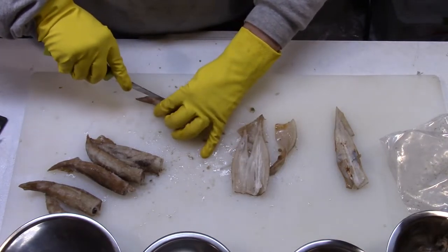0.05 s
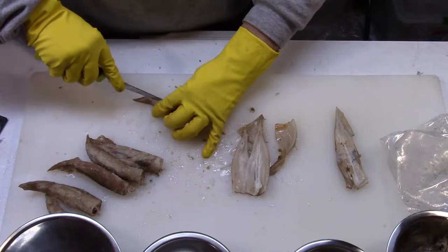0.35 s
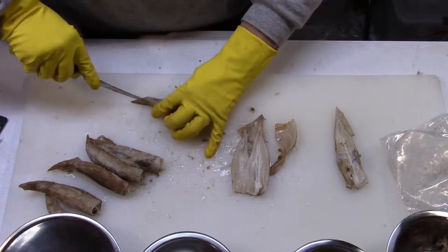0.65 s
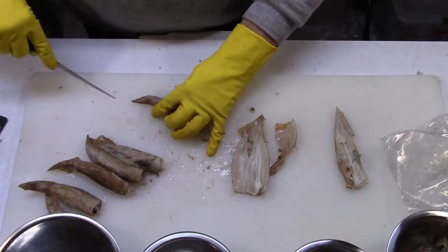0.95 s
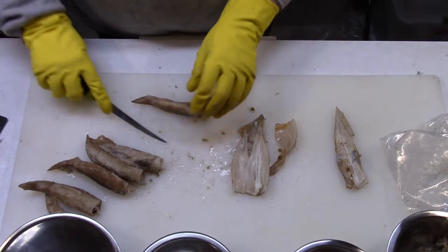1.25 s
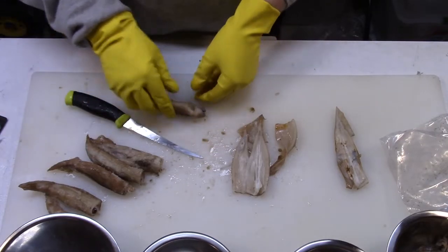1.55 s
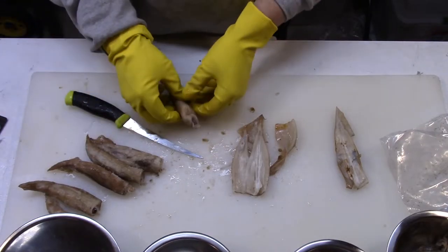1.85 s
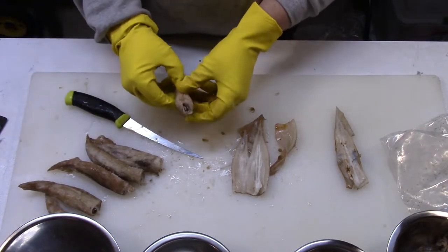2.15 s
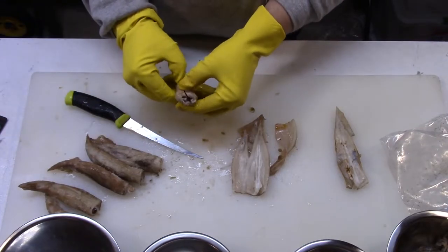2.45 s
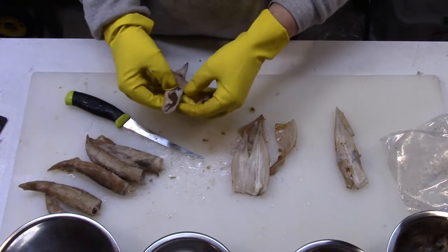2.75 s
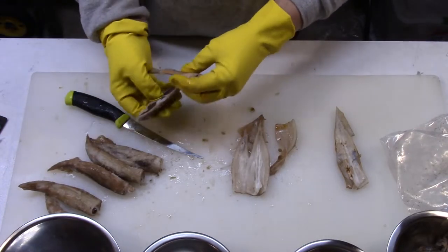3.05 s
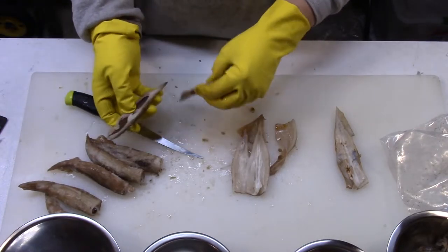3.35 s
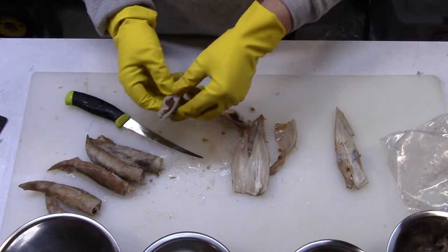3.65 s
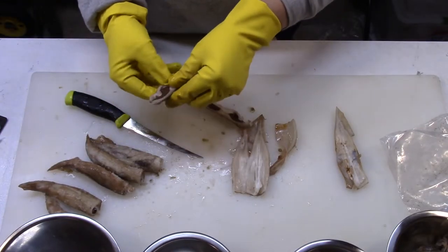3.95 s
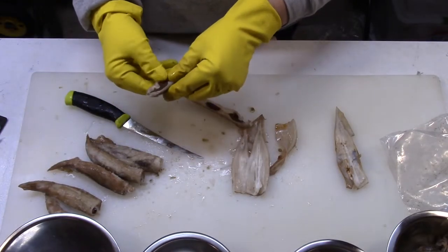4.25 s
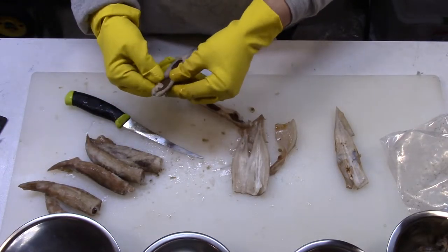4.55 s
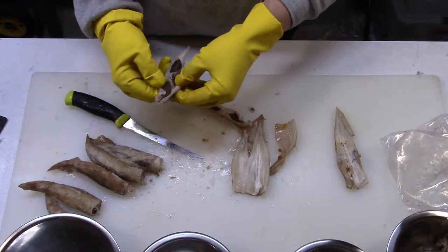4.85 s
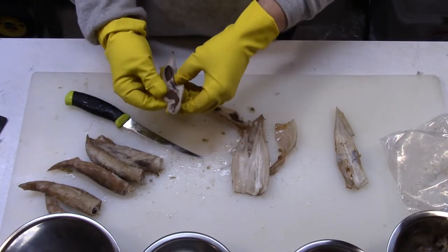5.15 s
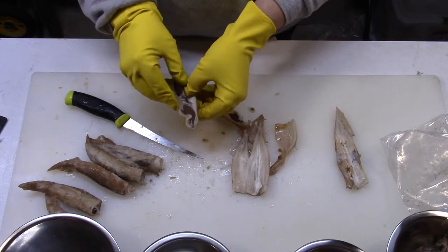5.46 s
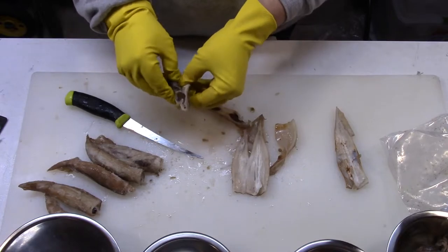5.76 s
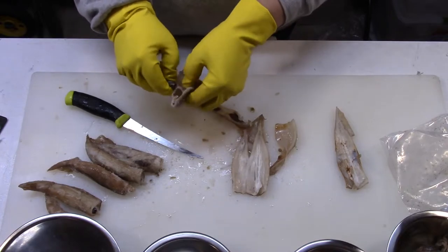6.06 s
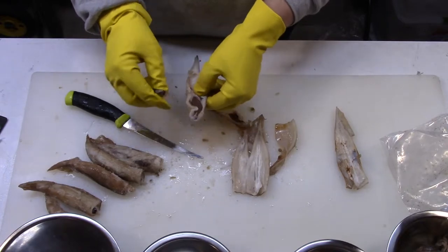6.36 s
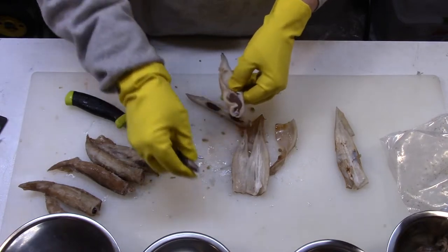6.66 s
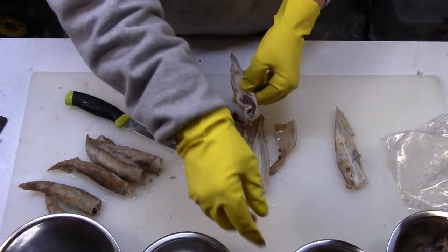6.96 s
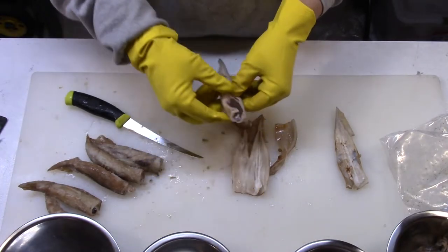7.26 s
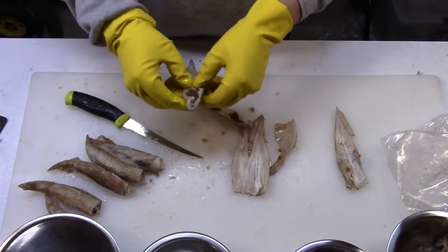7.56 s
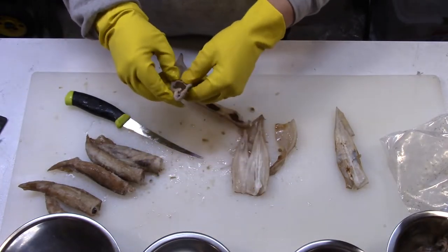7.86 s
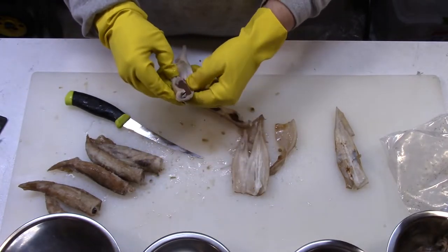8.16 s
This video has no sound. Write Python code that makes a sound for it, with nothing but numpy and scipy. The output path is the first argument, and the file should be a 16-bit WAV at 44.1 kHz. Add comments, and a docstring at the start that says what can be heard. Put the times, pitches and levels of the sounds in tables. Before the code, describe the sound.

For the first 0.8 seconds a knife grates softly through half-frozen squid on a plastic cutting board. Rubber gloves squeak and rub around 1 second. At about 1.4 seconds the knife is dropped on the board with a short, hollow, ringing clatter, by far the loudest sound. Gloves and sleeves rustle, and wet skin peels with small ticks until about 3 seconds. At 3.5 seconds a piece is put down with a dull knock. Quiet peeling continues, with sticky crackles, tiny snaps and thin squeaks, busiest from 4.6 to 6.2 seconds. Between 7 and 7.3 seconds scraps land in steel bowls with a few dull taps, the last sharper and ringing faintly. More soft ticks and rubbing follow from 7.8 to 8.4 seconds. Everything is close, in a small room, with the faint steady hum of a cooling unit's fan and motor behind it.

```python
"""In a small room, rubber-gloved hands cut and peel half-frozen squid on a plastic board, close by.
The knife grates through icy flesh and is dropped, making the board ring; later a piece is put down.
Gloves and wet skin stick and slip in tiny jerks, so they rustle, squeak and tick. Scraps are flicked
into steel bowls, one of which rings faintly. The fan and motor of a cooling unit hum behind it all."""
import sys
import numpy as np
from scipy import signal
from scipy.fft import rfft, irfft, next_fast_len
from scipy.io import wavfile
from scipy.ndimage import uniform_filter1d, map_coordinates

SR = 44100
rng = np.random.default_rng(int(sys.argv[2]) if len(sys.argv) > 2 else 0)


def unload_wav(signal):
    """Save mono or channel-first audio to the path in sys.argv[1] as 16-bit WAV at rate SR, clipped to [-1, 1]."""
    wavfile.write(
        sys.argv[1],
        SR,
        np.round(np.clip(np.atleast_2d(signal).T, -1, 1) * 32767).astype(np.int16),
    )


N = 370881

# the tones of the board on its table: (pitch [Hz], level [dB], fade time [s])
BOARD_TONES = [(68, -28, .5), (175, -6, 0.22), (252, 0.5, 0.086), (285.8, 2, 0.11), (321, -6, .06),
               (425.5, -5.5, 0.26), (492, -11.5, 0.27), (578, -8, .12), (613.5, -6, 0.14), (677, 2.5, 0.11),
               (720, -3, 0.041), (904, -12, .06), (954, 0, 0.13), (1080, -15, 0.045), (1210, -15.5, 0.04),
               (1263, -6, .08), (1585, -13, 0.11), (1650, -17.5, 0.098), (1960, -13, .08)]


def amp(db):
    """Turn decibels into a gain."""
    return 10 ** (np.asarray(db) / 20)


def unit(x):
    """Scale a sound to an average (rms) level of 1."""
    return x / np.sqrt(np.mean(x ** 2) + 1e-20)


def burst(x):
    """Scale a short sound to the energy of 10 ms at level 1."""
    return x / np.sqrt(np.sum(x ** 2) / (SR / 100) + 1e-20)


def along(points, hz):
    """Read between (frequency [Hz], value) points, with octaves evenly spaced."""
    freqs, values = np.transpose(points)
    return np.interp(np.log(hz + 1), np.log(freqs + 1), values)


def wobble(rate):
    """A smooth curve through `rate` random values a second."""
    points = rng.standard_normal(int(N * rate / SR) + 4)
    return map_coordinates(points, [np.arange(N) * rate / SR], order=2)


def filtered(x, response):
    """Multiply each frequency f in a sound by response(f)."""
    n = x.shape[-1]
    padded = next_fast_len(n + 8192)
    return irfft(rfft(x, padded) * response(np.fft.rfftfreq(padded, 1 / SR)), padded)[..., :n]


def coloured(x, spectrum):
    """Shape bass and treble with (frequency [Hz], level [dB]) points."""
    return filtered(x, lambda f: amp(along(spectrum, f)))


def resonant(x, hz, width):
    """A resonance: it favours a band `width` Hz wide around `hz`."""
    return filtered(x, lambda f: 1j * f * width / (hz * hz - f * f + 1j * f * width))


def fade(t, t60):
    """Die away by 60 dB in t60 seconds, the fade time."""
    return np.exp(-np.log(1000) * t / t60)


def ring(tones, t, attack_s):
    """The fading tones of a struck object, building up as the blow spreads through it."""
    ringing = sum(amp(db) * fade(t, t60) * np.sin(2 * np.pi * hz * t) for hz, db, t60 in tones)
    return (1 - fade(t, attack_s)) * ringing


def add(track, start, sound):
    """Mix a sound in at `start` seconds."""
    part = track[round(start * SR):][:len(sound)]
    part += sound[:len(part)]


def slips(rate, spread_db):
    """Surfaces stick and slip: about `rate` tiny jerks a second, a few stronger than the rest."""
    happens = rng.random(N) < rate / SR
    size = np.minimum(rng.exponential(size=N), 4)
    sign = rng.choice([-1, 1], N)
    return unit(happens * sign * amp(spread_db * size))


def moves(rows, attack_s=0.027, release_t60=0.16):
    """One gain curve for each level column: every move swells quickly, holds and lets go slowly."""
    t = np.arange(SR) / SR
    powers = np.zeros((len(rows[0]) - 2, N))
    for start, length, *levels in rows:
        release = fade(np.maximum(t - length - attack_s / 2, 0), release_t60)
        shape = np.minimum(t / attack_s, 1) * release
        for power, db in zip(powers, levels):
            add(power, max(start - attack_s / 2, 0), (amp(db) * shape) ** 2)
    return np.sqrt(powers)


def pockets(x, depth_db):
    """Folds of rubber and skin form small hollows, whose resonances come and go."""
    bands = signal.stft(x, nperseg=512)[2]
    patches = rng.standard_normal(bands.shape)
    for _ in range(2):  # smooth over frequency and over time
        patches = uniform_filter1d(uniform_filter1d(patches, size=3, axis=0), size=9, axis=1)
    return unit(signal.istft(bands * amp(depth_db * unit(patches)), nperseg=512)[1][:N])


def knocks(rows, tones, clutter_db, thud_db):
    """Blows make an object ring; soft flesh stirs only its low tones and muffles them."""
    # the hard edge of a blow: (frequency [Hz], level [dB])
    click_colour = [(300, -31), (1500, 8), (4000, -1), (7000, -27), (11000, -25), (16000, -38)]
    out, t = np.zeros(N), np.arange(SR // 3) / SR
    struck = ring(tones, t, attack_s=.006)
    for start, db, hz, click_db, damping_t60 in rows:
        clutter, click, thud = rng.standard_normal((3, len(t)))
        clutter = resonant(resonant(clutter * fade(t, 0.11), 540, 1000), 550, 1600)  # weak table tones
        body = (burst(struck) + amp(clutter_db) * burst(clutter)) * fade(t, damping_t60)
        body = resonant(body, hz, 0.78 * hz)  # the softer the contact, the lower its pitch
        click = coloured(click * fade(t, 0.039), click_colour)
        thud = resonant(resonant(thud * fade(t, 0.2), 76.8, 120), 75, 120)  # the table gives a little
        blow = burst(body) + amp(click_db) * burst(click) + amp(thud_db) * burst(thud)
        add(out, start, amp(db) * blow)
    return filtered(out, lambda f: 1j * f / (120 + 1j * f))  # a small object gives off little bass


def ticks(rows, width, crack_db, crack_t60, crack_width, overtone_db):
    """Each contact is a sudden crack and a short rattle, pitched by the size of what snaps."""
    out, t = np.zeros(N), np.arange(SR // 8) / SR
    for start, db, hz, t60 in rows:
        rattle_noise, crack_noise = rng.standard_normal((2, len(t)))
        force = rattle_noise * fade(t, t60)
        overtone = amp(overtone_db) * resonant(force, 2.13 * hz, 2.0 * width * hz)
        rattle = resonant(force, hz, width * hz) + overtone
        crack = resonant(crack_noise * fade(t, crack_t60), hz, crack_width * hz)
        tick = resonant(burst(rattle) + amp(crack_db) * burst(crack), hz, 2 * hz)
        add(out, start, amp(db) * burst(tick))
    return out


def room(x, echo_db, stereo_width):
    """Near walls echo briefly; a small left-right phase difference widens the treble."""
    # how long the walls echo: (frequency [Hz], fade time [s])
    echo_times = [(150, 0.3), (1000, 0.12), (5000, 0.15), (14000, 0.06)]
    hz, t, bands = signal.stft(rng.standard_normal(SR // 3), SR, nperseg=256)
    echo = signal.istft(bands * fade(t, along(echo_times, hz)[:, None]), SR, nperseg=256)[1]
    echo = np.pad(echo / np.linalg.norm(echo), (SR // 200, 0))  # arrives 5 ms late
    mid = x + amp(echo_db) * signal.fftconvolve(x, echo)[:N]
    side = filtered(mid, lambda f: 1j * amp(along(stereo_width, f)))
    return np.array([mid + side, mid - side])


def background(air_db=-58.0):
    """The room's air rushes steadily while the cooling unit's fan whirs and its motor hums."""
    # the room's air: (frequency [Hz], level [dB])
    air_colour = [(15, -61), (25, -29), (76, -15), (108, -4.5), (180, -9.5), (236, -2), (293, -3.5),
                  (354, -2.5), (575, -5.5), (695, -7), (1130, -11.5), (1520, -4.5), (1840, -10.5),
                  (6740, -20.5), (16000, -29.5)]
    # the fan's airy resonances: (pitch [Hz], width [Hz], level [dB])
    fan_bands = [(165.5, 44, -69), (374, 300, -77), (914, 130, -69), (1521, 79, -68.5)]
    # the motor's hum: (pitch [Hz], level [dB])
    motor_tones = [(120, -74), (360.7, -70), (721.4, -77), (839.8, -78.5)]
    t = np.arange(N) / SR
    mid, side = unit(coloured(rng.standard_normal((2, N)), air_colour)) * amp(air_db)
    side = amp(-19) * coloured(side, [(30, 11.6), (120, 13.0), (1500, 12.8), (10000, 1.2)])
    for hz, width, db in fan_bands:
        mid += amp(db) * unit(resonant(resonant(rng.standard_normal(N), hz, width), hz, width))
    for hz, db in motor_tones:
        mid += amp(db) * np.sqrt(2) * np.sin(2 * np.pi * hz * t + 0.44 * wobble(1.256))
    return np.array([mid + side, mid - side])


def drags():
    """Sleeves and gloves brush the board in a dull, uneven rustle."""
    # each drag over the board: (start [s], length [s], level [dB])
    sweeps = [(.505, 0.037, -57), (.55, 0.4, -61), (1.0, 0.51, -58), (1.55, 0.22, -56.5), (1.8, 0.3, -63),
              (2.15, 0.28, -62)]
    # the dull brushing: (frequency [Hz], level [dB])
    brush_colour = [(50, -18), (130, -2.5), (280, 4), (480, -3.5), (700, 0.5), (1400, -12), (2500, -22)]
    weight, = moves(sweeps)
    return weight * amp(0.83 * wobble(25)) * unit(coloured(slips(rate=2500, spread_db=3), brush_colour))


def squelches(width=0.11, judder_db=4):
    """Wet rubber slips unevenly, stirring a narrow resonance that glides as the rubber stretches."""
    # each squeak: (start [s], length [s], level [dB], pitch [Hz], glide [octaves])
    squeaks = [(.912, 0.031, -41.5, 490, 0.15), (0.915, 0.013, -43, 1120, -.026),
               (0.933, 0.037, -38.5, 1180, .23), (0.939, 0.039, -47, 1770, 0.19),
               (0.946, 0.087, -44, 696, -0.12), (0.724, 0.064, -51, 3150, 0),
               (1.199, 0.16, -52, 3970, -0.19), (1.236, 0.037, -46, 673, -0.051),
               (1.262, 0.16, -47, 1300, -.29), (1.65, 0.18, -51.5, 3080, -.1),
               (2.111, 0.055, -55, 1800, -0.15), (2.61, 0.1, -54.5, 3570, 0.15),
               (3.854, .024, -53, 2800, 0), (4.663, .13, -53.5, 9700, -0.16),
               (4.726, 0.026, -50.5, 4500, 0.031), (4.875, 0.1, -60, 2700, .08),
               (5.14, 0.19, -56, 2620, .033), (5.356, 0.18, -61.5, 1870, -0.087),
               (5.802, 0.035, -52.5, 4530, -.14), (5.835, 0.041, -54, 1900, 0),
               (5.876, 0.019, -41.5, 3720, -.23), (5.927, 0.089, -53, 6600, -0.014),
               (8.297, 0.034, -53, 2520, 0.33)]
    out = np.zeros(N)
    judder = amp(judder_db * wobble(350))
    for start, length, db, hz, glide in squeaks:
        noise = rng.standard_normal(SR // 2)
        progress = np.linspace(0, 1, round(length * SR))
        tone = resonant(resonant(noise, hz, width * hz), hz, hz)
        speed = 2 ** (glide * (progress - .5))  # reading the tone faster raises its pitch
        tone = map_coordinates(tone, [np.cumsum(speed)], order=3)
        tone *= judder[round(start * SR):][:len(tone)]
        add(out, start, amp(db) * unit(tone) * np.sin(np.pi * progress))
    return out


def hands(stroke_gain_db=-1.5, tick_db=-7, pocket_db=3):
    """Rubber rubs in many small slips; wet skin parts in fewer, brighter ones, with stray ticks."""
    # each grip, slide or pull: (start [s], length [s], rubbing [dB], crackle [dB])
    strokes = [(.98, .19, -54, -69), (1.045, 0.014, -46, -54.5), (1.17, 0.25, -47.5, -57.5),
               (1.48, .1, -57.5, -65), (1.585, 0.037, -50, -62), (1.66, 0.041, -42.5, -54),
               (1.72, 0.069, -49.5, -57.5), (1.8, 0.18, -54, -65), (2.055, .29, -62, -68),
               (2.118, 0.028, -45.5, -53.5), (2.495, 0.058, -56, -54), (2.61, 0.065, -52.5, -53.5),
               (2.74, 0.41, -59, -64.5), (2.96, 0.043, -58.5, -69), (3.14, 0.13, -61.5, -71),
               (3.42, .02, -58, -61), (3.55, 0.074, -60.5, -66), (3.685, 0.038, -51.5, -63),
               (4.08, 0.049, -59, -66), (4.2, 0.052, -61, -66), (4.47, 0.074, -69, -65),
               (4.72, 0.17, -66, -60), (4.875, 0.18, -64.5, -59.5), (4.97, 0.026, -54.5, -51.5),
               (5.125, .2, -59, -60.5), (5.265, 0.021, -56, -58), (5.355, 0.057, -54, -59),
               (5.42, 0.11, -56.5, -63), (5.73, .08, -60, -60), (5.805, 0.069, -51, -50),
               (5.94, 0.082, -53.5, -53), (6.05, 0.2, -57, -64), (6.1, 0.014, -56, -61),
               (6.83, 0.068, -63, -71), (7.11, 0.052, -60, -63), (7.26, 0.087, -62, -68.5),
               (7.78, 0.11, -64, -61), (7.89, 0.28, -83, -62.5), (8.16, 0.053, -59.5, -56),
               (8.3, 0.078, -59, -66), (8.355, 0.016, -53.5, -60)]
    # glove on glove: (frequency [Hz], level [dB])
    rub_colour = [(400, -15), (900, -2), (1400, 0.5), (2200, -0.5), (3300, 2), (5000, -7.5), (9000, -20),
                  (14000, -46)]
    # wet, icy skin: (frequency [Hz], level [dB])
    crackle_colour = [(2000, -34), (4000, -4.5), (6000, -2.5), (8500, 1), (11000, -3.5), (15500, -14.5)]
    rubbing, parting = moves(strokes)
    grip = amp(stroke_gain_db + 2 * wobble(55))
    rub = pockets(coloured(slips(rate=3500, spread_db=2.5), rub_colour), pocket_db)
    skin = slips(rate=1000, spread_db=3.5) + amp(1) * rng.standard_normal(N)
    crackle = pockets(coloured(skin, crackle_colour), 0.59 * pocket_db)
    stray = unit(resonant(slips(rate=27, spread_db=2.5), 4400, 5150))
    return grip * (rubbing * rub + parting * crackle) + amp(tick_db) * parting * stray


def snaps():
    """Rubber, ice and wet skin snap in single, louder ticks."""
    # each snap: (time [s], level [dB], pitch [Hz], fade time [s])
    hits = [(.312, -50, 3350, 0.061), (.6145, -43, 3930, .018), (.650, -51, 8000, .005),
            (.666, -50, 6000, .0087), (.722, -45, 5000, .02), (.994, -49.5, 3350, .021),
            (1.865, -58, 2550, .015), (1.9555, -49.5, 6200, .019), (2.2385, -52.5, 3350, .02),
            (2.3103, -48.5, 3820, 0.018), (2.4865, -47, 5000, 0.0096), (2.6682, -46.5, 4000, 0.026),
            (2.79, -54, 4840, 0.046), (4.598, -45.5, 3350, 0.018), (4.5985, -48.5, 9100, 0.0034),
            (4.6735, -52.5, 10200, .02), (4.7355, -44, 9150, .017), (5.051, -57, 6000, .012),
            (5.8828, -45.5, 4060, .016), (5.947, -52, 6700, .0061), (5.966, -48, 7500, .012),
            (6.018, -50, 4900, 0.0095), (6.249, -54.5, 3200, .012), (6.269, -58, 4120, .015),
            (7.8865, -46.5, 5440, 0.03), (7.9533, -55, 5960, .008), (8.190, -52, 3700, .015),
            (8.2055, -49.5, 4170, 0.041), (8.296, -53, 8250, .017)]
    return ticks(hits, width=0.28, crack_db=-5.5, crack_t60=0.0072, crack_width=1.8, overtone_db=-9.5)


def ringing_bowl():
    """A scrap muffles the steel where it lands; a few tones ring on."""
    # the scrap hitting bare steel: (time [s], level [dB])
    hits = [(7.244, -26.5)]
    # the steel bowl: (pitch [Hz], level [dB], fade time [s])
    steel_tones = [(686, -28.5, 1.35), (845, -6, 0.019), (996, 13, 0.013), (1200, -6, 0.021),
                   (1400, -28, 0.83), (1676, -15.5, 0.12), (1723, -4, 0.041), (8900, -39, .15)]
    out, t = np.zeros(N), np.arange(SR) / SR
    for start, db in hits:
        add(out, start, amp(db) * burst(resonant(ring(steel_tones, t, attack_s=0.007), 1360, 2600)))
    return out


def landing_scraps():
    """Scraps land dully in part-filled bowls, whose contents deaden the ringing."""
    # each landing: (time [s], level [dB], contact pitch [Hz], relative click [dB], muffling time [s])
    landings = [(7.0503, -39, 450, -14, .06), (7.0504, -37.5, 1400, -15, 0.19),
                (7.0592, -32.5, 414, -16, 0.086), (7.089, -39, 300, -3, 0.1), (7.1, -43, 450, -9, .12),
                (7.2437, -39, 262, -9, 0.23)]
    # a part-filled bowl: (pitch [Hz], level [dB], fade time [s])
    dull_tones = [(117, -0.5, .1), (249, -1.5, 0.063), (330, 2, 0.052), (420, -12, .06), (880, -3, 0.097),
                  (1022, 2, 0.07), (1250, -10, .05), (1680, -6, .07)]
    return knocks(landings, dull_tones, clutter_db=-7, thud_db=-17)


def board_blows():
    """Knife handle, knuckles and squid strike the board; what lies on it muffles the ringing."""
    # each blow: (time [s], level [dB], contact pitch [Hz], relative click [dB], muffling time [s])
    blows = [(.933, -45, 402, -28, 0.065), (.962, -40.5, 700, -32, 0.067), (.989, -44, 600, -10, .1),
             (1.175, -34, 480, -28, 0.23), (1.3941, -13.5, 910, -18.5, 0.17),
             (1.4098, -15, 1170, -8.5, 0.29), (1.421, -23.5, 280, -35, 0.18), (1.438, -27.5, 500, -3.5, .2),
             (1.4555, -19.5, 334, -26, 0.24), (1.4711, -16.5, 780, -40, 0.26), (1.504, -36, 280, -35, 0.37),
             (3.5079, -29, 750, -25, .07), (3.5095, -24, 267, -24, 0.048), (3.522, -31, 169, -32, .17),
             (3.555, -44.5, 650, -12, .3)]
    return knocks(blows, BOARD_TONES, clutter_db=-7.5, thud_db=-28)


def clacks():
    """The blade and icy scraps hit sharply and rattle."""
    # each part that rattles: (time [s], level [dB], pitch [Hz], fade time [s])
    hits = [(1.4388, -21, 7740, 0.067), (1.4392, -25, 4100, 0.12), (1.473, -42.5, 8000, 0.031),
            (3.508, -44, 4160, 0.058), (3.509, -49, 8850, 0.014), (7.0488, -44, 7400, 0.028),
            (7.049, -47, 12200, .03), (7.0892, -45.5, 3600, 0.029), (7.09, -54, 12000, 0.035),
            (7.1005, -39, 3080, 0.011), (7.121, -67, 6000, .02), (7.244, -37, 7460, 0.0084),
            (7.2442, -36.5, 11900, 0.072), (7.2442, -42, 2900, 0.013)]
    return ticks(hits, width=0.41, crack_db=-1, crack_t60=0.0056, crack_width=0.2, overtone_db=-16)


def cutting(flesh_db=-1, clump_db=2.5):
    """The blade grates through frozen flesh, breaking ice and shaking the board."""
    # each push: (start [s], length [s], level [dB], relative board level [dB], relative ice level [dB])
    cuts = [(0, 0.047, -53.5, -0.5, -18), (0.197, 0.17, -58.5, -3.5, -13), (.36, .15, -58.5, 3.5, -16),
            (0.505, 0.094, -46, -2, -6), (0.603, 0.2, -51.5, -3.5, -5), (0.736, 0.037, -42, -8, -1)]
    # frozen flesh parting: (frequency [Hz], level [dB])
    flesh_colour = [(500, -20), (1200, -7), (3300, 2), (5500, -7), (8000, -1.5), (11000, -10), (15500, -23)]
    push, shake, shear = moves([(start, length, db, db + board_db, db + ice_db)
                                for start, length, db, board_db, ice_db in cuts])
    board_ring = ring(BOARD_TONES, np.arange(SR // 3) / SR, attack_s=0.0027)
    board = signal.fftconvolve(slips(rate=2700, spread_db=9), board_ring)[:N]  # every slip rings it
    grate = unit(resonant(board, 970, 470)) + unit(resonant(slips(rate=1500, spread_db=4), 930, 1300))
    ice_colour = [(2000, -27), (6000, -8), (12000, -2), (16000, 0)]
    ice = unit(coloured(slips(rate=2000, spread_db=15), ice_colour))
    flesh = pockets(coloured(slips(rate=6000, spread_db=4), flesh_colour), depth_db=3.5)
    return shake * unit(grate) + shear * ice + push * amp(flesh_db + clump_db * wobble(61.1)) * flesh


def scene():
    """All the work on the board and over the bowls, in its room."""
    # how wide the fingers, board and bowls sound in stereo: (frequency [Hz], side level [dB])
    finger_width = [(100, -36), (1300, -42), (4400, -19.5), (8000, -22.5), (15000, -35)]
    board_width = [(100, -47), (600, -50), (1300, -27), (4400, -17.5), (8000, -16), (14000, -15)]
    bowl_width = [(600, -22), (1300, -28), (8000, -18)]
    fingers = hands() + squelches() + snaps()
    blows = board_blows() + clacks()
    bowls = ringing_bowl() + landing_scraps()
    lean_right = amp([[-.3], [.3]])
    return (room(fingers + cutting() + drags(), echo_db=-11.5, stereo_width=finger_width) * lean_right
            + room(blows, echo_db=-14.5, stereo_width=board_width)
            + room(bowls, echo_db=-12, stereo_width=bowl_width)
            + background())


def record(dry):
    """The highest treble is softened, then cut off steeply above 16000 Hz."""
    softened = coloured(dry, [(12500, -0.5), (16000, -6)])
    return filtered(softened, lambda f: 1 / (1 + (f / 16000) ** 160))


dry = scene()
out = record(dry)
unload_wav(out)
```